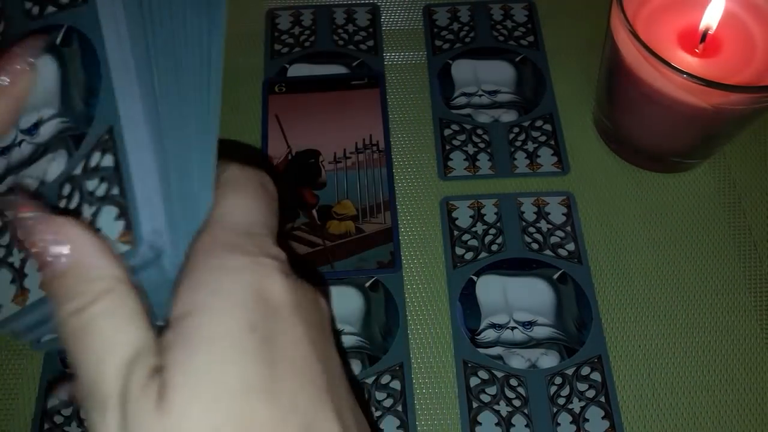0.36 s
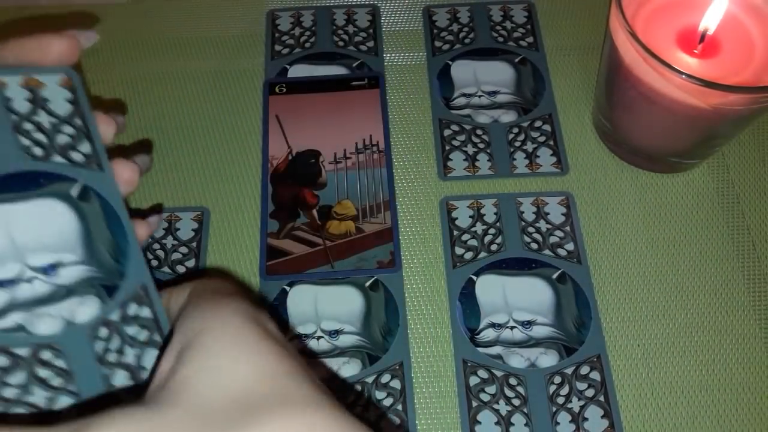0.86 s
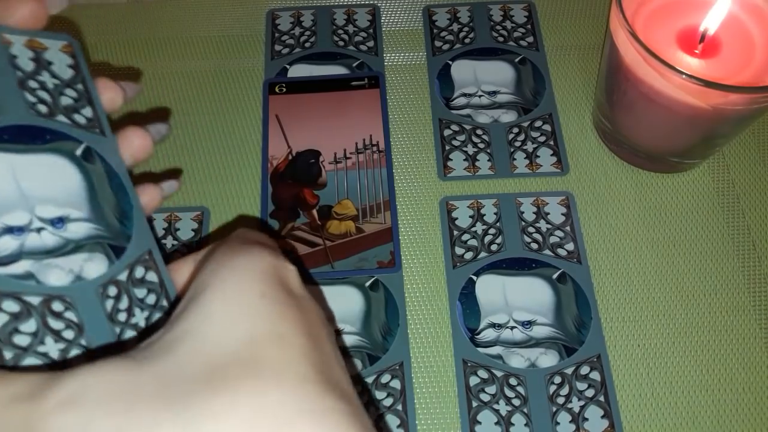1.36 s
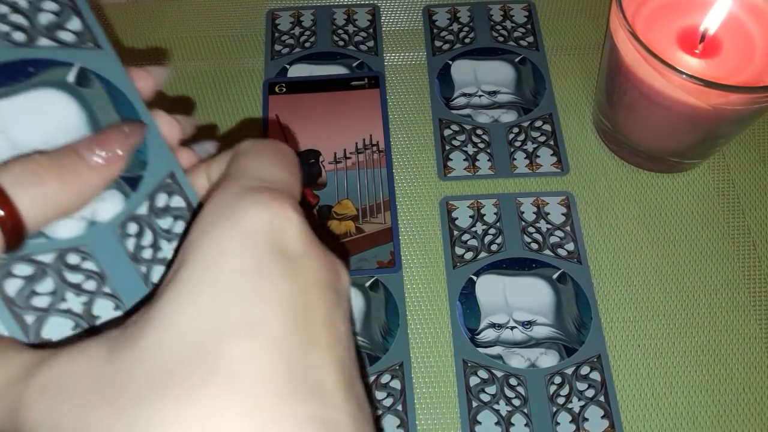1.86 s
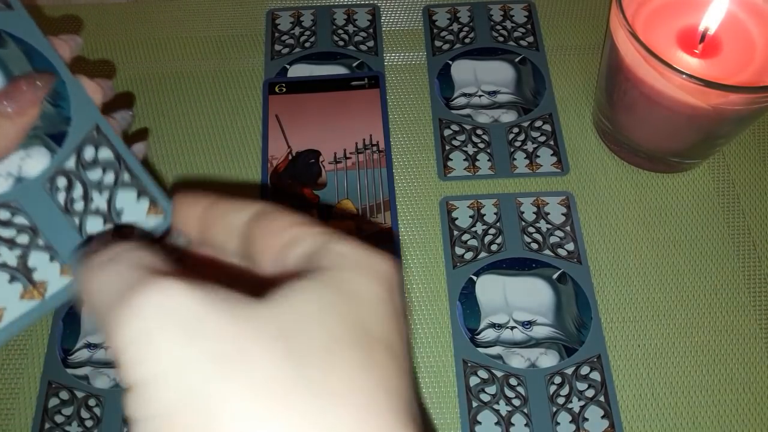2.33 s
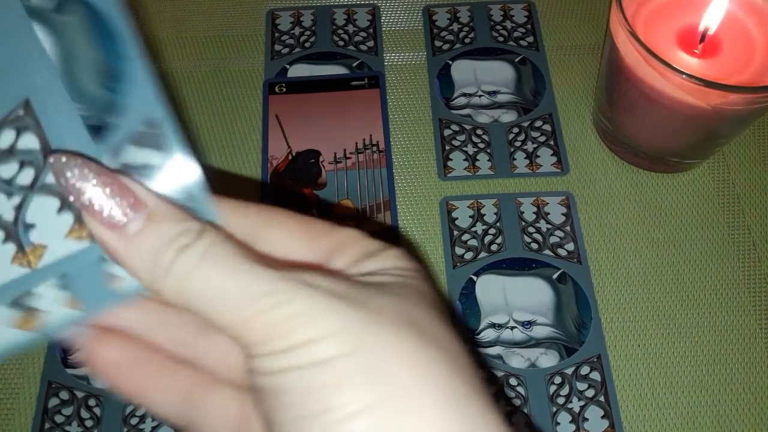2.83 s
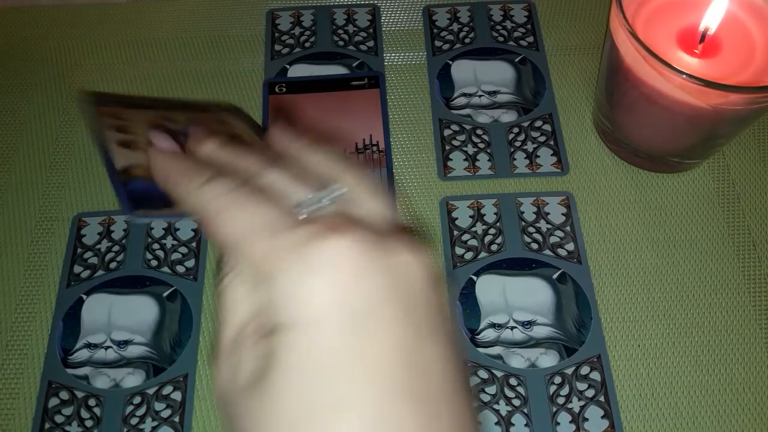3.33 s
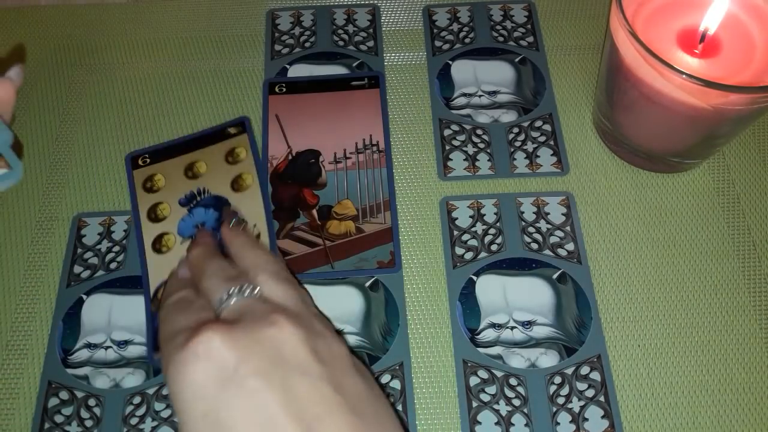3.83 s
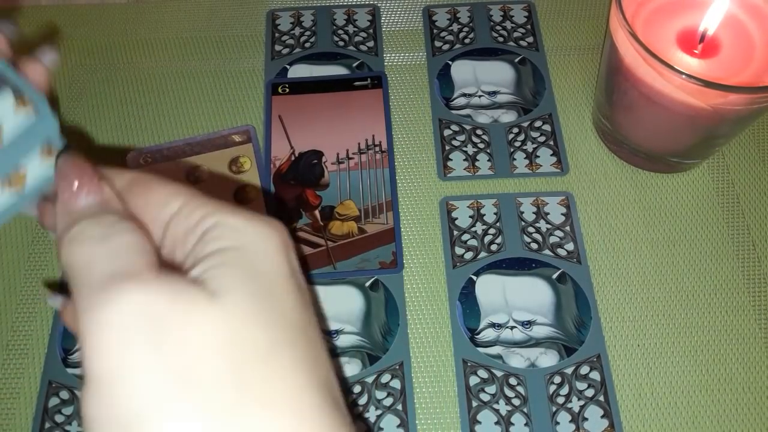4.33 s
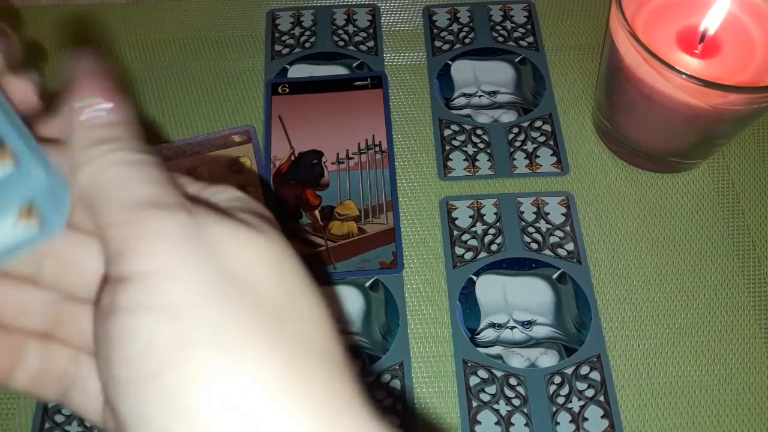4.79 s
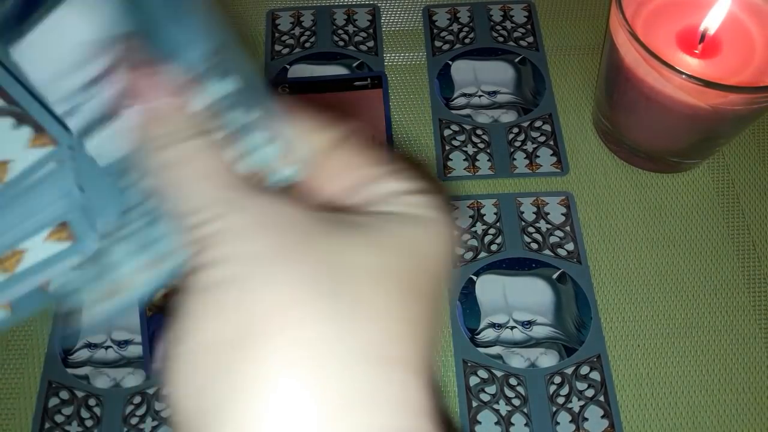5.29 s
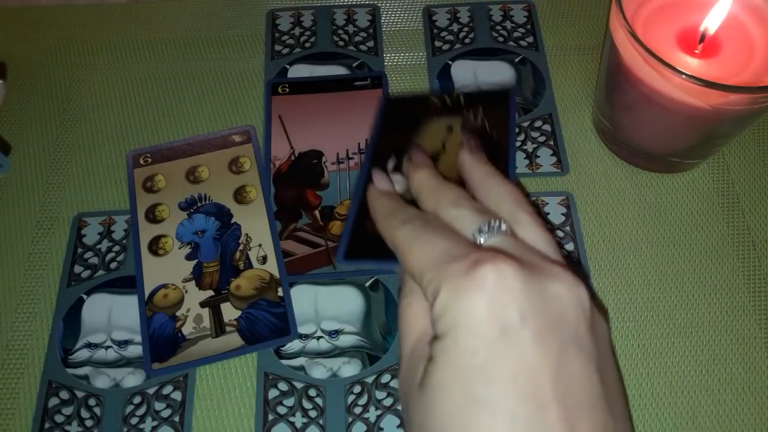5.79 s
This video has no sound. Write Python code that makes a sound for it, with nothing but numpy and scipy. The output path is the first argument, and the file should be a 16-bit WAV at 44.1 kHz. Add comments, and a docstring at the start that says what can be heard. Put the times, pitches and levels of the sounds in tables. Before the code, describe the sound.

Close, dry card handling: papery hisses, sharp edge clicks and soft slaps as cards are pulled from a deck and placed on a table.

```python
"""A quiet room rumbles and a few thin squeaks of skin on varnish lead in; then hands draw stiff cards
from a deck and lay them on a mat. Sliding faces hiss, edges and nails tick, bent cards slap and rustle.
Slides are clumped, patchy noise through card resonances; ticks are sharp bursts with short damped rings;
slaps are low decaying pulses; rustle and room are coloured noise, with wavering tones in the room modes."""
import sys
import numpy as np
from scipy import signal
from scipy.io import wavfile
from scipy.ndimage import uniform_filter1d

SR = 44100
rng = np.random.default_rng(int(sys.argv[2]) if len(sys.argv) > 2 else 0)


def ratio(d):
    """dB to gain"""
    e = np.asarray(d, float) / 20
    return 10 ** e


def inscribe(sig):
    """Save sig as 16-bit PCM at rate SR to the path in sys.argv[1].

    A 1-D sig is mono; a 2-D sig holds one channel per row.
    Samples are clipped to [-1, 1] before scaling.
    """
    pcm = np.round(np.clip(np.atleast_2d(sig).T, -1, 1) * 32767)
    wavfile.write(sys.argv[1], SR, pcm.astype(np.int16))


N = 260631  # length in samples

# The two bending modes of the held card move with its free length and grip. Each row: time in seconds,
# upper mode in Hz, its level in dB, lower mode in Hz, its level in dB, both over the fixed ring of the deck.
BENDING_MODES = [(0.107, 1550, -3, 1000, -16), (0.15, 1900, -6, 800, -11), (0.31, 2050, -6, 1200, -12),
                 (0.36, 1900, -6, 1250, -12), (0.47, 1780, -8, 850, -13), (0.59, 1780, 3, 900, -16),
                 (0.63, 1750, -4, 880, -9), (0.74, 1600, -6, 800, -12), (0.82, 1900, -6, 1380, 0),
                 (1.13, 2150, 0, 1200, -15), (1.73, 2350, 3, 1200, -15), (1.85, 2030, 8, 990, -2),
                 (2.3, 2030, 4, 1000, -10), (2.46, 2400, 0, 1250, -15), (2.55, 2200, 2, 1250, -5),
                 (2.72, 2200, 0, 1230, 0), (2.78, 2050, 7, 1200, -15), (2.9, 1750, 9, 800, -3),
                 (2.96, 2000, 0, 900, -12), (3.15, 1900, -3, 1200, -12), (3.45, 1894, 0, 980, -10),
                 (3.8, 2150, 6, 1000, -20), (4.0, 1800, 3, 1000, -20), (4.75, 1500, 6, 1250, -10),
                 (4.83, 1800, 3, 900, -15), (5.05, 1950, 12, 1100, -20), (5.17, 1950, 12, 1000, -15),
                 (5.3, 1520, 12, 850, -20), (5.5, 1800, -2, 950, -13), (5.62, 2250, -4, 850, -13)]
# The fine bright edge of slides and ticks. Each row: frequency in Hz, relative density in dB per Hz.
SHEEN_SPECTRUM = [(5290, -16.5), (9000, 3.5), (11700, 4.5), (15800, 0.5)]


def evened(x):
    """Scales to rms 1."""
    return x / np.sqrt(np.mean(x ** 2) + 1e-20)


def drift(size):
    """Slow random wander of rms 1: noise averaged twice over size samples."""
    once = uniform_filter1d(rng.standard_normal(N), size=size)
    return evened(uniform_filter1d(once, size=size))


def coloured(x, points):
    """Filters by a spectrum drawn on a log-frequency axis, causally, keeping unit power for white input."""
    f, db = np.transpose(points)
    hz = np.abs(np.fft.fftfreq(8192, 1 / SR))
    log_gain = np.log(ratio(np.interp(np.log(hz + 1), np.log(f + 1), db)))
    minimum_phase = np.exp(np.conj(signal.hilbert(log_gain)))
    taps = np.fft.ifft(minimum_phase).real[:4096]
    return signal.oaconvolve(x, taps / np.linalg.norm(taps))[:len(x)]


def resonate(x, hz, width):
    """Shifts hz down to zero, smooths, and shifts back: a resonance of gain 1 that may glide."""
    turn = np.exp(2j * np.pi * np.cumsum(hz * np.ones(len(x))) / SR)
    r = np.exp(-np.pi * width / SR)
    return 2 * (turn * signal.lfilter([1 - r], [1, -r], x / turn)).real


def ring(t, hz, t60):
    """One damped mode: a sine falling 60 dB in t60 seconds."""
    return np.sin(2 * np.pi * hz * t) * ratio(-60 * t / t60)


def add(mix, s, sound):
    """Mixes a sound in at time s."""
    part = mix[round(s * SR):][:len(sound)]
    part += sound[:len(part)]


def curve(rows):
    """Joins the rows of a table by straight lines in time, one array a column."""
    s, *columns = np.transpose(rows)
    return [np.interp(np.arange(N) / SR, s, c) for c in columns]


def swells(s, db, swell_ms, fade_ms, power=1):
    """Power of each event on a millisecond grid: a rise and fall of 20 dB in the given times."""
    late_ms = np.arange(N * 1000 // SR + 2)[:, None] - 1000 * s
    away = np.maximum(late_ms / fade_ms, -late_ms / swell_ms)
    return ratio(db - 20 * away ** power) ** 2 + 1e-30


def per_sample(v):
    """From the millisecond grid to samples."""
    return np.interp(np.arange(N) / SR, np.arange(len(v)) / 1000, v)


def grit(per_s, spread_db, smooth, lump_db):
    """Countless tiny slips of uneven size over a smooth hiss, coming in short clumps."""
    hits = rng.random(N) < per_s / SR
    sizes = ratio(spread_db * np.minimum(rng.exponential(1, N), 4))
    slips = hits * sizes * rng.standard_normal(N)
    lumps = drift(300)
    return evened((evened(slips) + smooth * rng.standard_normal(N)) * ratio(lump_db * lumps))


def patchy(x, patch_db):
    """The contact patch keeps changing, so bands a few hundred Hz wide come and go."""
    hz, t, z = signal.stft(x, SR, nperseg=256)
    field = uniform_filter1d(rng.standard_normal((len(t), len(hz))), size=14, axis=0)
    field = evened(uniform_filter1d(field, size=3, axis=1))
    return evened(signal.istft(z * ratio(patch_db * field.T), SR, nperseg=256)[1][:len(x)])


def card(x):
    """The broad fixed resonances of card and deck, summed with alternating sign."""
    # Each row: resonance in Hz, width in Hz, level in dB.
    deck_modes = [(900, 400, -11), (1300, 500, -3), (2200, 700, -3)]
    total = 0
    for k, (hz, width, db) in enumerate(deck_modes):
        total = total + (-1) ** k * ratio(db) * resonate(resonate(x, hz, width), hz, width)
    return evened(total)


def room_tone():
    """Broad floor and a faint drone in each room mode, wavering in pitch and level."""
    # Room tone and hiss. Each row: frequency in Hz, relative density in dB per Hz.
    floor_spectrum = [(18, -19), (30, -22.5), (118, -0.5), (303, -13), (684, -26), (962, -20.5),
                      (1250, -24), (1960, -24), (2350, -25.5), (6720, -26), (7870, -30.5), (8980, -36.5),
                      (14800, -21), (16000, -21)]
    # Where rumble gathers. Each row: mode in Hz, width of its pitch wander in Hz.
    room_modes = [(48, 0.85), (84, 8), (135, 3.5), (248, 3.7)]
    # Swell and fade of the drone. Each row: time in seconds, then the level in dB in each of the four modes.
    drone_levels = [(0, -90, -102, -108, -77.5), (1.0, -73, -77, -76.5, -88), (1.45, -75, -104, -82, -76.5),
                    (1.7, -73, -70, -97, -72.5), (2.1, -79, -76.5, -83.5, -82),
                    (3.2, -82, -73.5, -90.5, -75), (3.55, -77.5, -100, -77, -77), (4.4, -82, -84, -79, -92),
                    (4.9, -70.5, -80, -70.5, -70), (5.2, -74.5, -71.5, -72, -69),
                    (5.91, -71.5, -100.5, -72, -80)]
    tone = ratio(-66) * coloured(rng.standard_normal(N), floor_spectrum)
    for (hz, width), db in zip(room_modes, curve(drone_levels)):
        waver = drift(4000)
        flutter = drift(2500)
        phase = 2 * np.pi * np.cumsum(hz + width / 2 * waver) / SR
        tone += ratio(db + 3 * flutter) * np.sqrt(2) * np.sin(phase)
    return tone


def flexing():
    """Cards flexing in the hand push air: a low, clumpy rustle that swells over a faint resting level."""
    # Each row: peak time in seconds, level in dB, time to fade 20 dB in ms.
    flexes = [(0.14, -43.5, 57), (0.63, -66, 149), (0.74, -66.5, 60), (1.62, -64, 85), (1.861, -60, 205),
              (2.511, -58, 78), (2.993, -36, 63), (3.17, -63, 106), (3.437, -56.5, 103),
              (3.991, -53.5, 114), (4.772, -63.5, 311), (5.341, -34, 82.5), (5.48, -61.5, 95.5),
              (5.56, -56, 120), (5.622, -54, 52)]
    # Colour of the rustle. Each row: frequency in Hz, relative density in dB per Hz.
    air_spectrum = [(53, -46.5), (110, -8), (220, -4.5), (416, -6), (636, -8.5), (802, -11.5), (900, -14),
                    (1170, -19.5), (1980, -120)]
    s, db, fade_ms = np.transpose(flexes)
    rest = ratio(-79)
    flex = np.sqrt(swells(s, db, 25, fade_ms).sum(1) + rest ** 2)
    rustle = coloured(grit(per_s=2000, spread_db=1.5, smooth=2.4, lump_db=3.5), air_spectrum)
    return per_sample(flex) * rustle


def squeaks():
    """Skin on card varnish: hiss in one narrow gliding resonance, quick to start and slower to fade."""
    # Each row: start in seconds, level in dB, pitch in Hz, pitch at the end in Hz, length in seconds.
    squeak_rows = [(0.001, -64, 2380, 2386, 0.016), (0.061, -61, 2500, 2500, 0.012),
                   (0.075, -59, 2460, 2400, 0.023), (0.087, -48.5, 3900, 3800, 0.009),
                   (1.12, -70.5, 2150, 1810, 0.12)]
    out = np.zeros(N)
    noises = rng.standard_normal((len(squeak_rows), SR // 5))
    for (s, db, hz, end_hz, length), noise in zip(squeak_rows, noises):
        u = np.arange(0, length, 1 / SR) / length
        glide = hz + (end_hz - hz) * u
        tone = evened(resonate(resonate(noise[:len(u)], glide, 240), glide, 240))
        add(out, s, ratio(db) * np.sin(np.pi * u ** 0.86) * tone)
    return out


def slides():
    """One rubbing force drives face hiss, sheen and a body ring that moves as the free length changes."""
    # Faces sliding on each other, on skin and on the mat. Each row: peak in seconds, rubbing force in dB,
    # time to swell 20 dB in ms, time to fade 20 dB in ms, dullness in dB, body ring in dB over the force.
    strokes = [(0.088, -60.5, 41, 31, 17, -21.5), (0.108, -34.5, 5.5, 125, -1, -9),
               (0.141, -34.5, 19.5, 46.5, -12.5, 0.5), (0.314, -46.5, 31, 88.0, 0, -15),
               (0.356, -44.5, 66, 22, -5, 0), (0.375, -54, 60.0, 150.0, -1, -6),
               (0.468, -43, 49, 12, 1.5, -10), (0.485, -54, 150.0, 102, -0.5, -11),
               (0.588, -42, 3.5, 74, -4.5, -8), (0.621, -50.5, 30, 241, -1, -9.5),
               (0.69, -54, 88, 97, -1, 3), (0.718, -43.5, 26, 35, -13, -13),
               (0.813, -50.5, 71, 129, -4, -9.5), (0.982, -52, 68, 66, -9, -14),
               (1.134, -55.5, 79, 160, -4.5, -13.5), (1.249, -63.5, 11, 127, -13, -36),
               (1.431, -66, 105, 237, -11.5, -20), (1.66, -54, 33.0, 290, -7.5, -18.5),
               (1.855, -63, 15, 169, -3, 19), (1.913, -56.5, 67, 98, -2.5, -11),
               (2.349, -69, 171, 149, -2, -14), (2.437, -55, 4, 345.5, -3.5, -15.5),
               (2.482, -35, 4, 24, 6, -21), (2.515, -38.5, 13, 33, 2, -9), (2.555, -52, 37, 79, -13, -10),
               (2.58, -53.5, 21, 187.5, -9.5, -1.5), (2.796, -44.5, 67.5, 166.5, -10, -13),
               (2.85, -48, 81.5, 324.5, 1.5, 2.5), (2.927, -34, 17.5, 72, -4.5, -15.5),
               (2.959, -34.5, 12.5, 108, 5, -7.5), (3.102, -55.5, 52, 364, -17, -17),
               (3.162, -43, 36, 128, 2, -6.5), (3.359, -58.5, 308, 178, -10, -34.5),
               (3.433, -50.5, 4, 125, 4.5, -13), (3.71, -71.5, 17, 65, 3, -7),
               (3.78, -53.5, 37, 114.5, 0, -15.5), (3.874, -48.5, 17, 110.5, 10, -10.5),
               (3.978, -20.5, 5.5, 7.5, 6.5, -16), (3.981, -33, 31.5, 50, 4, -8.5),
               (4.026, -49, 16, 153.5, 6.5, -13.5), (4.384, -56, 48, 68, -4.5, -8.5),
               (4.701, -61.5, 4, 215.5, 0, 4.5), (4.743, -36.5, 5.5, 118, 13, 3.5),
               (4.818, -43, 75, 80, -5, -13), (4.978, -48, 51, 61, -1, -27.5),
               (5.018, -41.5, 71, 42, 0.5, -12.5), (5.11, -55, 112, 217.5, -1.5, -10),
               (5.158, -48, 40, 80, -6, -8.5), (5.307, -45.5, 121, 113, 6, -1),
               (5.335, -24.5, 15, 66.5, 0.5, -5), (5.355, -42.5, 152.5, 271, -1.5, -13),
               (5.478, -40, 45, 41.5, 2.5, -8.5), (5.549, -44, 51, 116, -5, -14),
               (5.624, -48.5, 67.5, 92, 7, -11)]
    # Hiss of sliding faces. Each row: frequency in Hz, relative density in dB per Hz.
    face_spectrum = [(1530, -71), (2550, -12.5), (3000, -2), (3900, 3.5), (4680, 4), (5190, 1.5), (7310, 0),
                     (9000, -5), (11700, -75.5), (19800, -120)]
    s, db, swell_ms, fade_ms, dull, ringing = np.transpose(strokes)
    power = swells(s, db, swell_ms, fade_ms, power=1.2)  # over 1 rounds the top of each stroke
    total = power.sum(1)
    force = per_sample(np.sqrt(total))
    dull_db = per_sample(power @ dull / total)  # overlapping strokes blend by power
    body_db = per_sample(power @ ringing / total)
    sheen_db = -4 - 0.69 * dull_db  # a duller stroke has less fine sheen
    upper_hz, upper_db, lower_hz, lower_db = curve(BENDING_MODES)
    rub = patchy(grit(per_s=5000, spread_db=2.0, smooth=1.2, lump_db=1.3), patch_db=2.2)

    upper = evened(resonate(resonate(rub, upper_hz, 650), upper_hz, 650))
    lower = evened(resonate(resonate(rub, lower_hz, 250), lower_hz, 220))
    body = card(rub) + ratio(upper_db) * upper + ratio(lower_db) * lower
    body = body / np.sqrt(1 + ratio(upper_db) ** 2 + ratio(lower_db) ** 2)

    face = coloured(rub, face_spectrum)
    dark = signal.sosfiltfilt(signal.butter(2, 5300, fs=SR, output="sos"), face)
    face = ratio(dull_db / 2) * dark + ratio(-dull_db / 2) * (face - dark)  # dullness tilts the hiss
    return force * (face + ratio(body_db) * body + ratio(sheen_db) * coloured(rub, SHEEN_SPECTRUM))


def ticks():
    """Each tick: a sharp release with a brief rattle, short rings of card and edge, and a dying scrape."""
    # Edges slipping free, nails and corners striking. Each row: start in seconds, peak level in dB,
    # card ring in dB over the edge, edge ring in Hz, sheen in dB over the snap.
    tick_rows = [(0.1055, -27, -28, 3520, -1), (0.112, -12, -6.5, 5770, 2), (0.31, -30, -39, 3130, 4),
                 (0.358, -31, -13, 3230, 1), (0.374, -39, -6, 4500, -10), (0.626, -34.5, 1, 4400, -10),
                 (0.6585, -37, -9, 4500, 2), (0.6793, -27.5, -34, 3000, -16), (0.74, -32.5, -2, 4130, -17),
                 (0.9801, -23.5, -57, 7670, 38), (1.126, -33, -14, 7440, 12), (1.652, -32, -20, 7850, 14),
                 (1.8505, -25.5, -4, 4020, -5), (2.4323, -26, -39, 4830, 30), (2.4438, -33, -37, 4560, 11),
                 (2.461, -37, -26, 4330, 12.5), (2.4767, -23.5, -40, 5430, 0), (2.494, -22, -29, 4860, -4),
                 (2.5106, -26.5, -34, 4300, 10), (2.5538, -28, 1.5, 3620, -8.5),
                 (2.5812, -20.5, 4.5, 3600, 0), (2.591, -29, 3.5, 2440, -6), (2.852, -29, 2.5, 2940, 0.5),
                 (2.9578, -6, 1, 2820, -6.5), (2.99, -14, -5, 4140, -3), (3.0152, -14.5, -25, 4380, 0),
                 (3.077, -23, -15, 6640, -6.5), (3.114, -26, -15.5, 4740, -8),
                 (3.147, -18.5, -15, 4800, -26), (3.1684, -26.5, -5, 3870, -27),
                 (3.43, -18.5, -35, 6600, 12.5), (3.5023, -33.5, -22, 7540, -6),
                 (3.5284, -36, -16, 5080, 5), (3.7046, -44, -9.5, 4000, -6),
                 (3.8682, -34.5, -8.5, 4000, -22), (3.9473, -25.5, -38, 3850, -15),
                 (3.975, -7.5, -46.5, 4130, -4.5), (4.13, -38, -33, 3790, -12),
                 (4.1476, -34.5, -37.5, 4620, -25), (4.6955, -31.5, -11, 2980, -7),
                 (4.7382, -22.5, -38, 3260, -16), (4.7423, -15, -4.5, 2820, -14),
                 (4.772, -21, -26, 4530, -4), (4.7956, -14.5, -48, 3880, -10),
                 (4.975, -24.5, -20, 5840, -0.5), (5.33, -11.5, 4.5, 3670, -16),
                 (5.3469, -30, -21, 4920, -4.5), (5.384, -17.5, -8, 5530, -15),
                 (5.552, -29.5, -10, 4550, -6), (5.6215, -22.5, -8, 4620, -1.5)]
    # Colour of snap and scrape. Each row: frequency in Hz, relative density in dB per Hz.
    snap_spectrum = [(410, -52), (700, -31.5), (1310, -15.5), (2300, 1), (3160, 6), (5560, 2.5),
                     (7350, 1.5), (9000, -8.5), (11700, -38), (19800, -120)]
    card_t60, edge_t60 = 0.007, 0.007  # seconds
    out, scrape = np.zeros(N), np.zeros(N)
    t = np.arange(SR // 5) / SR
    short = t[:1300]
    noises = rng.standard_normal((len(tick_rows), 1300))
    modes = curve(BENDING_MODES)
    for (s, db, card_db, edge_hz, sheen_db), noise in zip(tick_rows, noises):
        upper_hz, upper_db, lower_hz, lower_db = (c[round(s * SR)] for c in modes)
        burst = 0.55 * noise * ratio(-60 * short / 0.009) + (short == 0)  # rattle and one click
        snap = coloured(burst, snap_spectrum) + ratio(sheen_db) * coloured(burst, SHEEN_SPECTRUM)
        edge = snap / abs(snap).max() + 0.92 * ring(short, edge_hz, edge_t60)
        bend = ring(short, upper_hz, card_t60)
        bend = bend + ratio(lower_db - upper_db) * ring(short, lower_hz, 1.8 * card_t60)
        both = edge / abs(edge).max() + ratio(card_db) * bend
        # nothing radiates under the lowest mode
        both = signal.sosfilt(signal.butter(6, 0.85 * lower_hz, "high", fs=SR, output="sos"), both)
        fade = np.cos(np.pi / 2 * short / short[-1])
        add(out, s, ratio(db) * both / abs(both).max() * fade)
        add(scrape, s, ratio(db - 35.5 - 60 * t / 0.0067))
    rub = rng.standard_normal(N)
    return out + scrape * (coloured(rub, snap_spectrum) + 0.42 * card(rub))


def flaps():
    """A bent card slapping flat pushes air: a soft, low, quickly damped pulse."""
    # Each row: start in seconds, level in dB ahead of damping and soft onset, settled pitch in Hz,
    # time to fall 60 dB in seconds.
    flap_rows = [(0.134, -30, 810, 0.0091), (0.145, -39.5, 132, 0.072), (2.957, -13, 313, 0.007),
                 (2.987, -18.5, 453, 0.025), (2.99, -10, 328.4, 0.0067), (3.014, -32, 204, 0.012),
                 (3.428, -41, 310, 0.021), (3.983, -29.5, 249, 0.024), (5.328, -14, 420, 0.015),
                 (5.338, -16.5, 329, 0.0099)]
    out, t = np.zeros(N), np.arange(SR // 8) / SR
    onset = 1 - np.exp(-t / 0.0011)
    for s, db, hz, t60 in flap_rows:
        cycles = hz * (t + 0.00022 * (1 - np.exp(-t / 0.0024)))  # pitch sags as the card settles
        add(out, s, ratio(db - 60 * t / t60) * np.cos(2 * np.pi * cycles) * onset)
    return out


def reflections(x):
    """Table, hands and walls: dense taps of random sign dying away."""
    t = np.arange(SR // 3) / SR
    signs = rng.choice([-1., 1.], len(t))
    present = (rng.random(len(t)) < 0.15) * (t > 0.004)
    taps = signs * present * ratio(-60 * t / 0.29)
    return signal.oaconvolve(x, taps / np.linalg.norm(taps))[:N]


def scene():
    """Everything reaches both channels alike; the low flaps and rustle are near-field and dry."""
    hands = slides() + ticks() + squeaks()
    mono = hands + ratio(-12.5) * reflections(hands) + flaps() + flexing() + room_tone()
    return np.tile(mono, (2, 1))


def low_pass(x):
    """Removes everything above the highest recorded frequency."""
    return signal.sosfilt(signal.butter(12, 16950, fs=SR, output="sos"), x)


def record(dry):
    """Adds a trace of hiss in opposite sign to the two channels, then cuts the bass and limits the band."""
    # Colour of the left-right unlike hiss. Each row: frequency in Hz, relative density in dB per Hz.
    side_spectrum = [(18, -44), (30, -9), (81, 2), (1070, -7.5), (1160, -9.5), (3580, -7.5), (16000, -9)]
    side = ratio(-76.0) * coloured(rng.standard_normal(N), side_spectrum)
    stereo = dry + np.array([side, -side])
    bass_cut = signal.sosfilt(signal.butter(4, 42, "high", fs=SR, output="sos"), stereo)
    mix = signal.oaconvolve(bass_cut, signal.firwin(511, 16050, fs=SR)[None], "same")
    return low_pass(mix)


dry = scene()
out = record(dry)
inscribe(out)
```